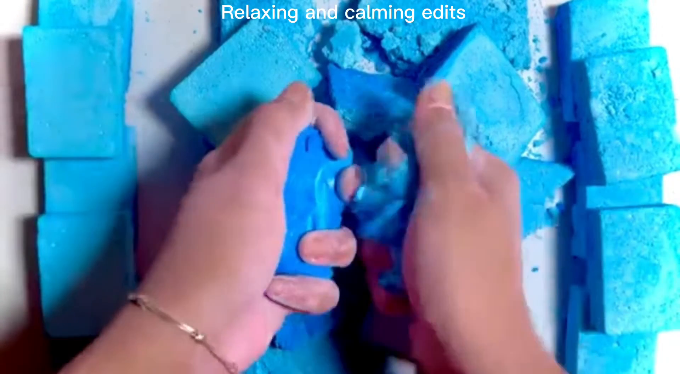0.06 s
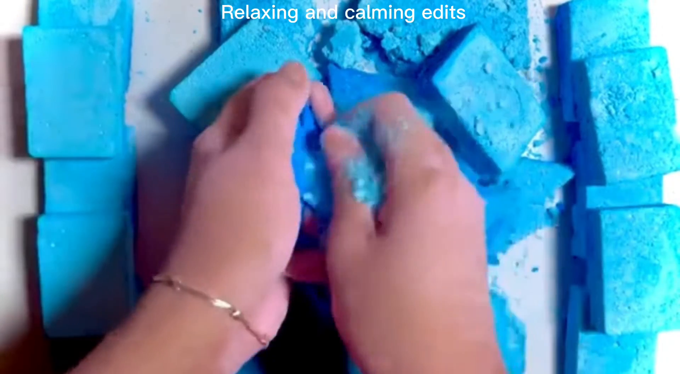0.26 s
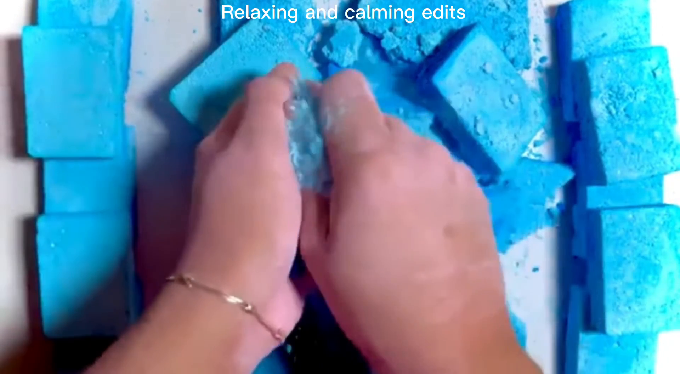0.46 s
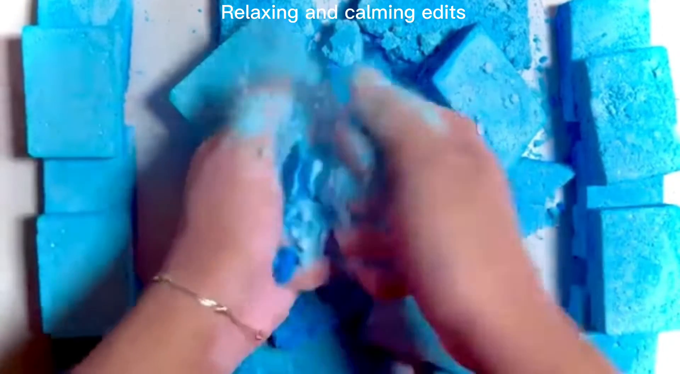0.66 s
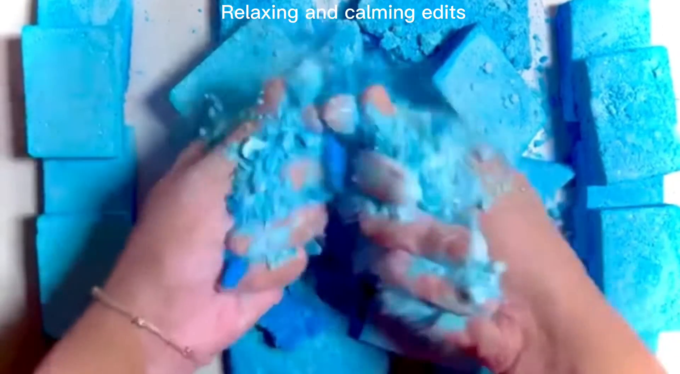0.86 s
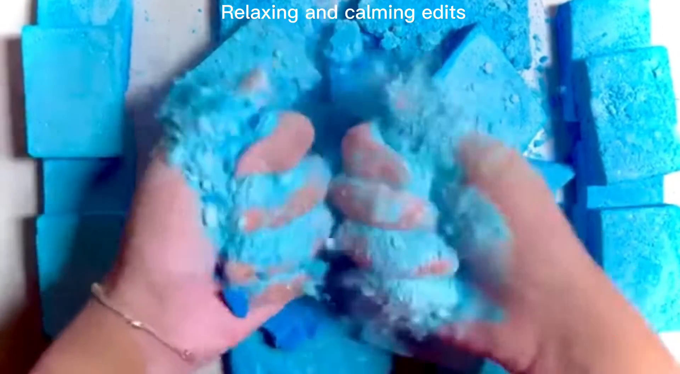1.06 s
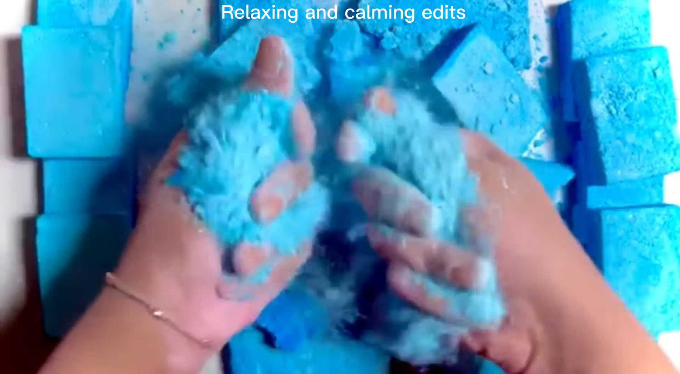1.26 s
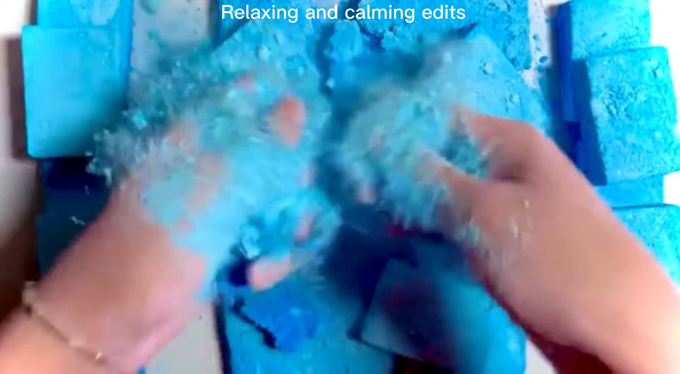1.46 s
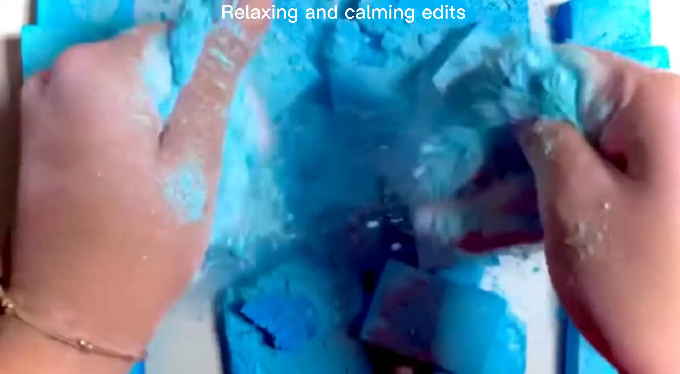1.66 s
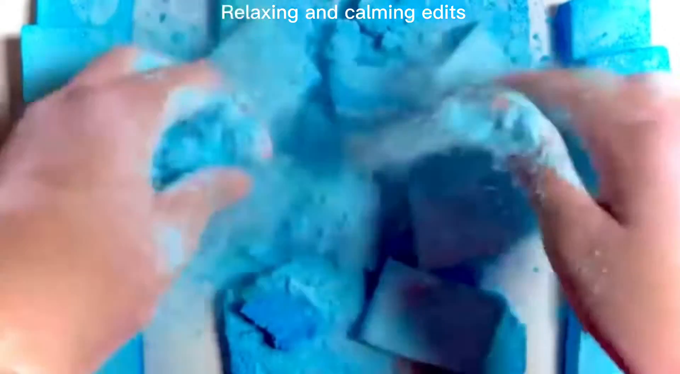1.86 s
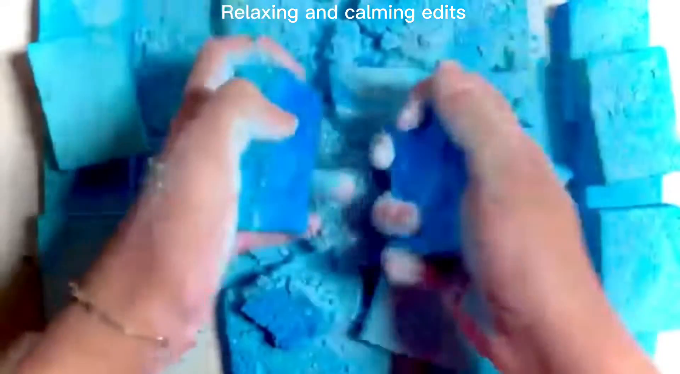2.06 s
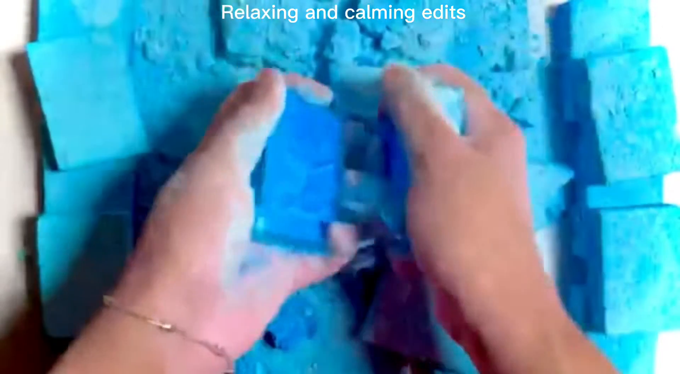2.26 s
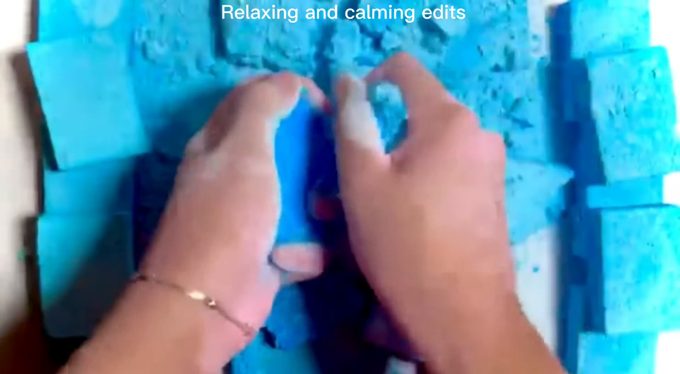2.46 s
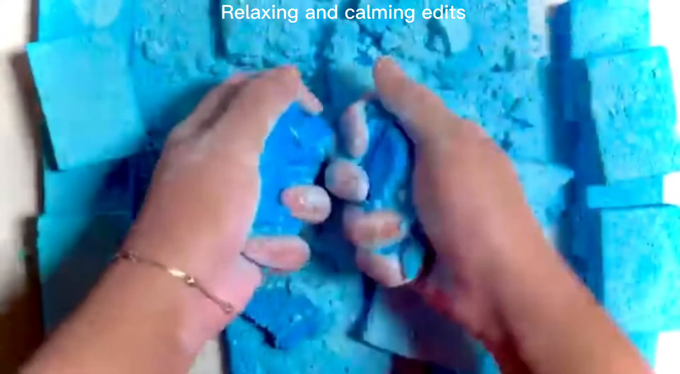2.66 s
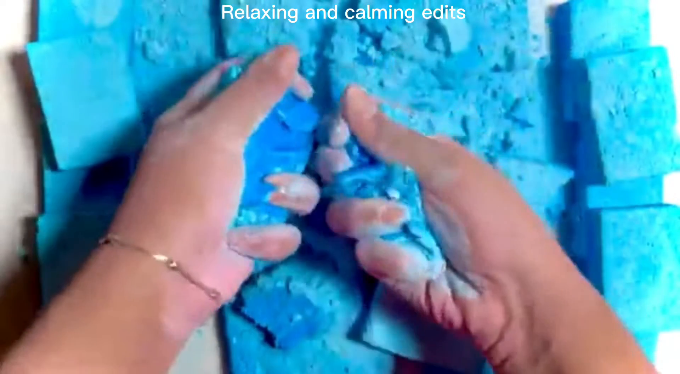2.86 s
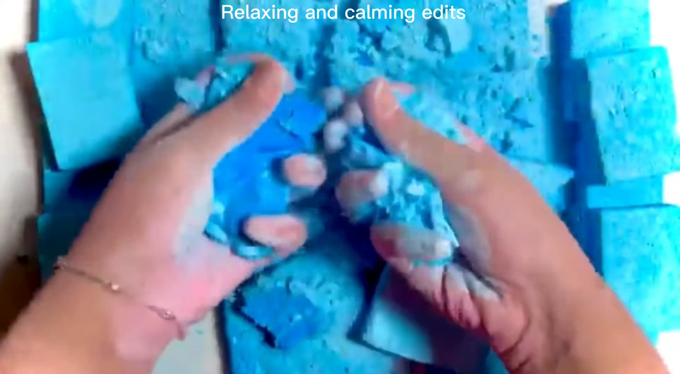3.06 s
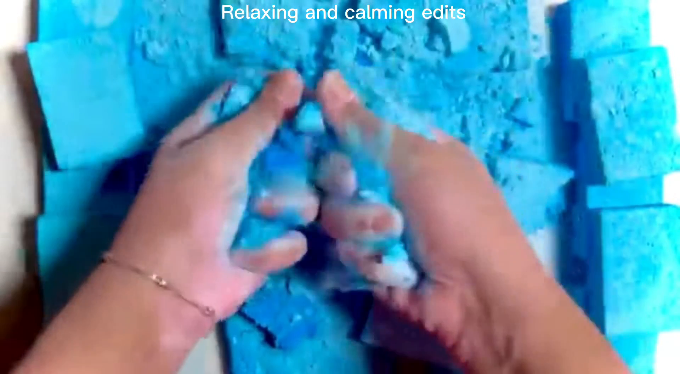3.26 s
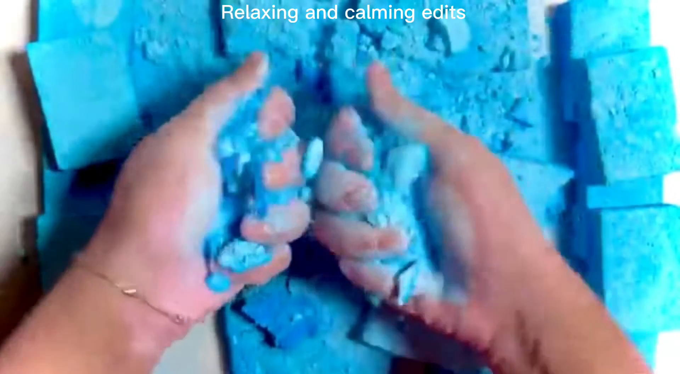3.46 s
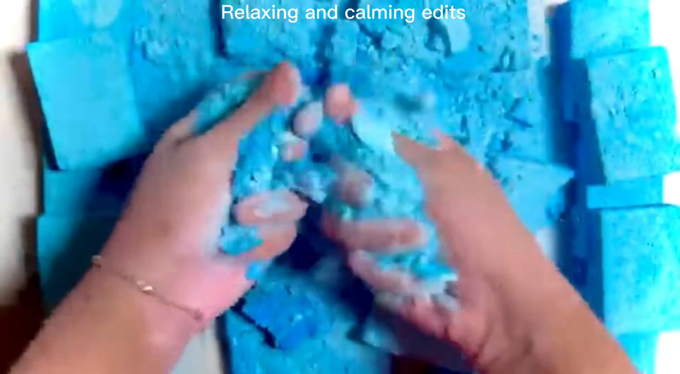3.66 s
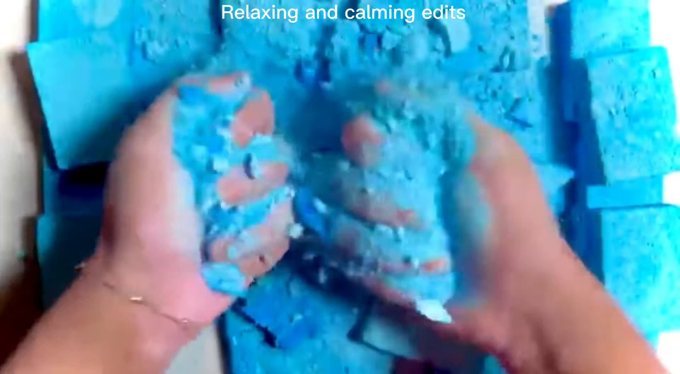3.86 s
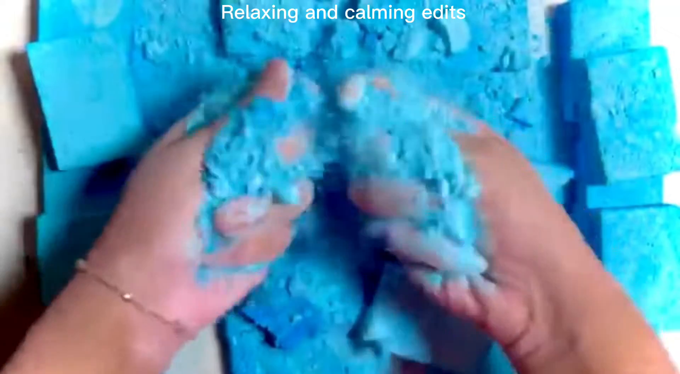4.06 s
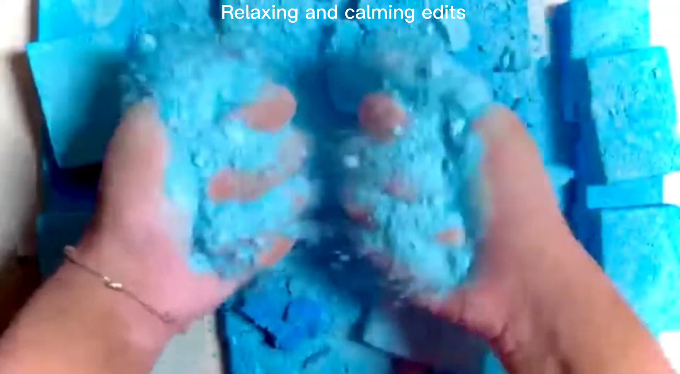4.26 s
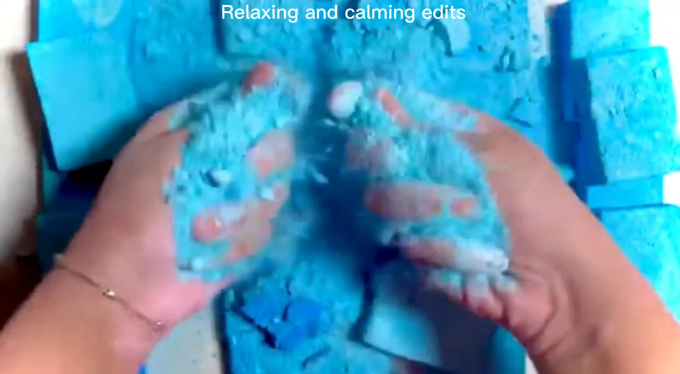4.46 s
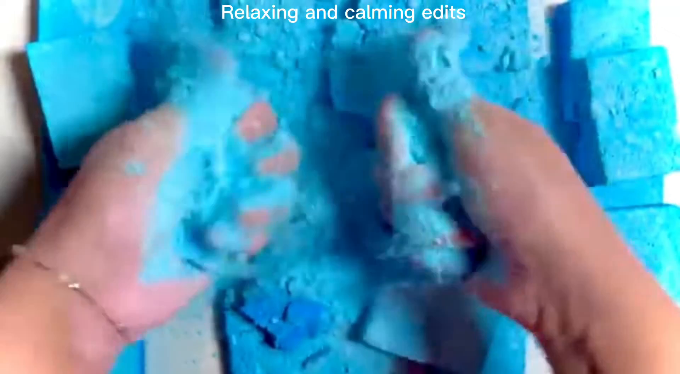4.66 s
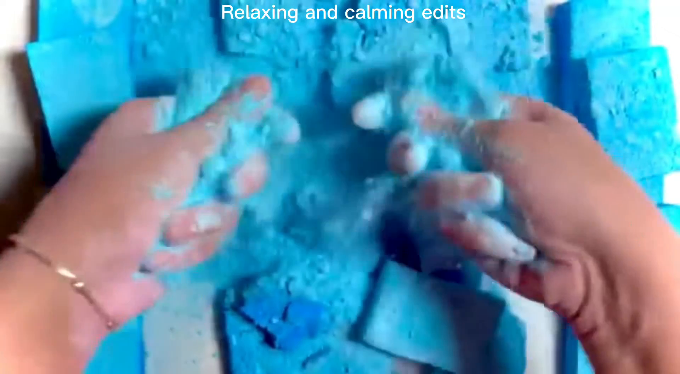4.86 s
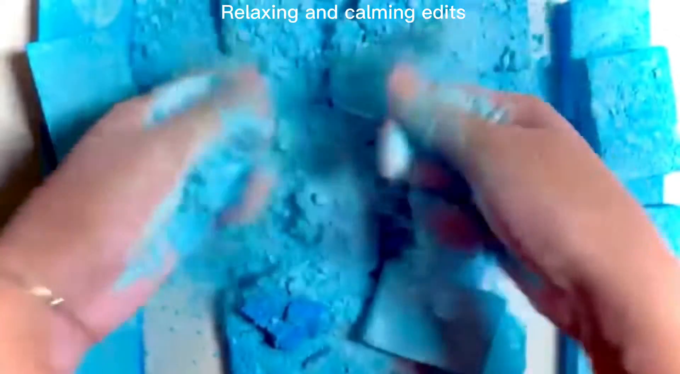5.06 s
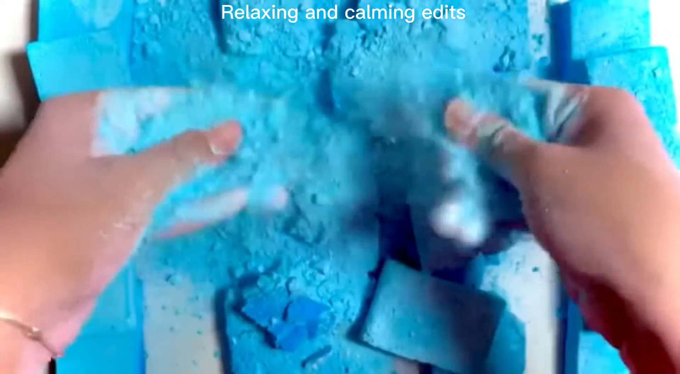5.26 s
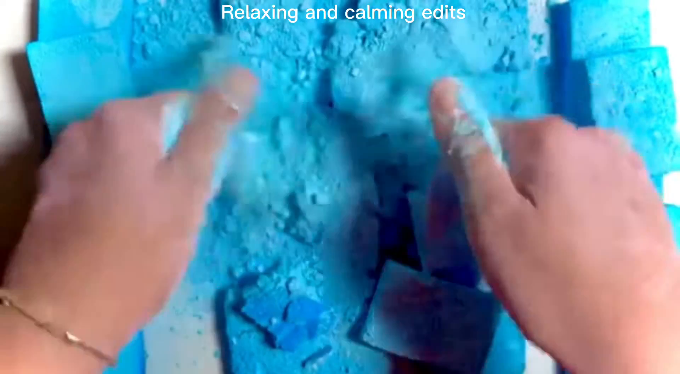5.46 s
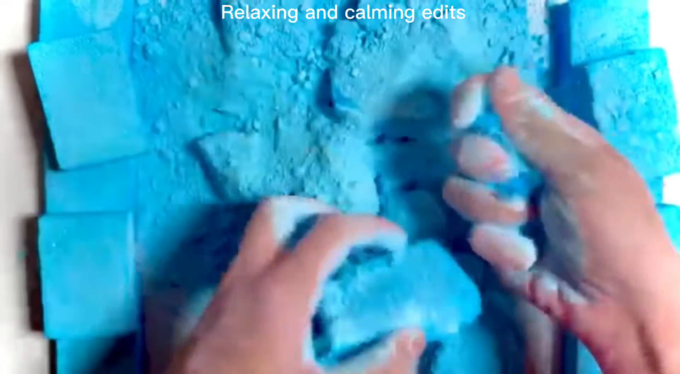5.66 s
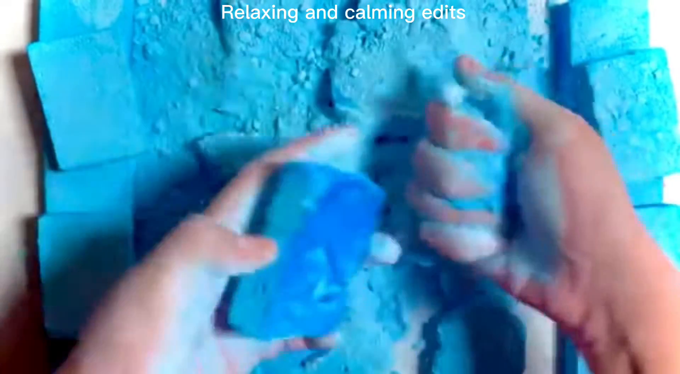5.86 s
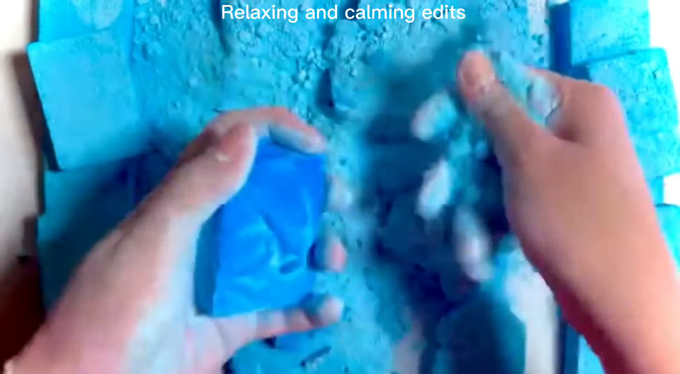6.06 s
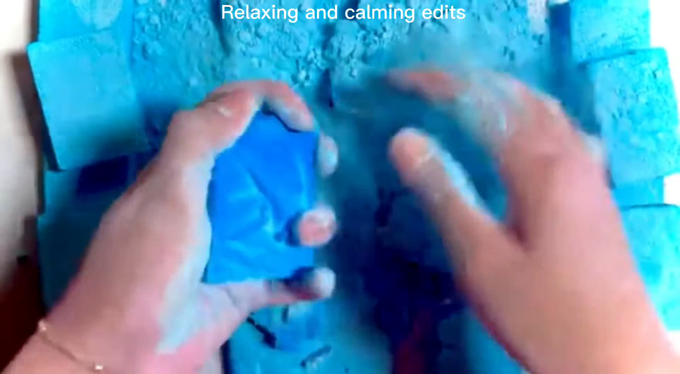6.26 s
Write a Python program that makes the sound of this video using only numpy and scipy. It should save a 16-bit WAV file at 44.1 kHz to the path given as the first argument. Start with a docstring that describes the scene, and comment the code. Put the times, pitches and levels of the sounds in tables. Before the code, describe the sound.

Two hands crush blocks of dry chalk close to a stereo microphone in a quiet room. Two sharp, gritty snaps come first, then the pieces are kneaded with soft crunching and hissing powder. A second cluster of cracks follows, with dull thuds in the palms, and one more break soon after. The rest is gentler, with repeated squeezes of rustling crumbs and spilling dust.

```python
"""Crushing dry chalk by hand

Two hands crush chalk blocks over a table, close to a small stereo microphone in a quiet room.
Blocks snap in short avalanches of fractures that ring the pieces and spray grit. Kneaded crumbs
stick and slip, clods cave in, powder hisses between the fingers and dull thuds sound in the hands."""
import sys
import numpy as np
from scipy import signal
from scipy.fft import rfft, irfft, next_fast_len
from scipy.io import wavfile
from scipy.ndimage import uniform_filter1d

SR = 44100
rng = np.random.default_rng(int(sys.argv[2]) if len(sys.argv) > 2 else 0)


def materialize(psi):
    """Save the field psi as 16-bit PCM at rate SR to the path in sys.argv[1].

    A 1-D psi becomes a single channel; in a 2-D psi each row is a channel.
    """
    bounded = np.clip(np.atleast_2d(psi).T, -1, 1)
    quanta = np.round(bounded * 32767).astype(np.int16)
    wavfile.write(sys.argv[1], SR, quanta)


N = 279153
TIME_S = np.arange(N) / SR
RING_SAMPLES = 4096


def from_db(db):
    return 10 ** (np.asarray(db) / 20)


def unit_rms(x):
    return x / np.sqrt(np.mean(x ** 2) + 1e-20)


def at_hz(table, hz):
    """Table lookup on a log-frequency axis."""
    knots_hz, values = np.transpose(table)
    return np.interp(np.log(np.maximum(hz, 1)), np.log(knots_hz), values)


def impulse(spectrum):
    """Minimum-phase impulse response of a spectrum table."""
    magnitude = from_db(at_hz(spectrum, np.fft.rfftfreq(RING_SAMPLES, 1 / SR)))
    cepstrum = irfft(np.log(magnitude))
    cepstrum[1:RING_SAMPLES // 2] *= 2
    cepstrum[RING_SAMPLES // 2 + 1:] = 0
    return irfft(np.exp(rfft(cepstrum)))


def through(x, response):
    return signal.fftconvolve(x, response)[:len(x)]


def resonance(x, hz, width_hz):
    radius = np.exp(-np.pi * width_hz / SR)
    feedforward = np.array([1, 0, -1]) * (1 - radius ** 2) / 2
    feedback = [1, -2 * radius * np.cos(2 * np.pi * hz / SR), radius ** 2]
    return signal.lfilter(feedforward, feedback, x + 1e-18)


def gliding_resonance(x, hz, width_hz):
    carrier = np.exp(2j * np.pi * np.cumsum(hz) / SR)
    radius = np.exp(-np.pi * width_hz / SR)
    return np.real(carrier * signal.lfilter([1], [1, -radius], x / carrier + 1e-18))


def drift(rate_hz):
    """Smooth random curve, unit RMS."""
    knots = rng.standard_normal(4096)
    return unit_rms(np.interp(TIME_S * rate_hz, np.arange(len(knots)), knots))


def steady(x, window_samples=3000):
    """Levels slow swings to unit RMS; fine grain stays."""
    power = uniform_filter1d(uniform_filter1d(x ** 2, window_samples), window_samples)
    return x / np.sqrt(np.abs(power) + 1e-12)


def add(track, time_s, sound, level_db):
    """Mixes in a sound with the energy of 10 ms at level_db."""
    start = max(round(time_s * SR), 0)
    sound = sound * from_db(level_db) * np.sqrt(0.01 * SR / (np.sum(sound ** 2) + 1e-20))
    track[start:start + len(sound)] += sound[:N - start]


def swell(peak_s, rise_s, fall_s, peak_db):
    """Near-bell-shaped power envelope of one gesture."""
    distance = np.abs((TIME_S - peak_s) / np.where(TIME_S < peak_s, rise_s, fall_s))
    return (from_db(peak_db) * np.exp(-np.minimum(distance ** 1.8, 20))) ** 2


def grains(per_s, spread_db, clump_db, clump_hz):
    """Tiny fractures, many weak and few strong, bunched by stick-slip."""
    sizes = from_db(spread_db * np.minimum(rng.exponential(1, N), 4))
    signs = rng.choice([-1, 1], N)
    hits = rng.random(N) < per_s / SR
    return hits * sizes * signs * from_db(clump_db * drift(clump_hz))


def avalanche(length_s, per_s, first_gain):
    """One break sets off a quick, dying run of others."""
    age = TIME_S[:RING_SAMPLES] / max(length_s, 0.0005)
    sizes = rng.standard_normal(RING_SAMPLES)
    hits = rng.random(RING_SAMPLES) < per_s / SR
    run = sizes * hits * np.exp(-age ** 2 / 2)
    run /= np.sqrt(np.sum(run ** 2)) + 1e-9
    run[0] += first_gain
    return run


# room background (frequency [Hz], gain [dB])
HUSH_SPECTRUM = [(15, -15), (30, -7), (70, -4.5), (130, 6), (260, -2.5), (600, -35), (16000, -46)]

def hush():
    """Low, steady noise of the quiet room."""
    return from_db(-52.5) * unit_rms(through(rng.standard_normal(N), impulse(HUSH_SPECTRUM)))


# rub through the palms (frequency [Hz], gain [dB])
RUB_SPECTRUM = [(40, -39), (80, -20), (130, -4), (200, -4.5), (310, -1), (450, -1.5), (620, -7.5),
                (1200, -42)]
# hollow between palm and fingers (time [s], resonance [Hz])
HOLLOW_GLIDE = [(0, 355), (1.35, 335), (1.8, 186), (3.0, 194), (3.85, 284), (4.08, 133), (4.6, 326),
                (5.1, 327), (5.5, 163)]

def palms():
    """Slipping crumbs, dull through the palms, ring the hollow as it changes size."""
    slips = grains(per_s=700, spread_db=1.5, clump_db=3.0, clump_hz=52)
    hollow_hz = np.interp(TIME_S, *np.transpose(HOLLOW_GLIDE))
    hollow = steady(gliding_resonance(slips, hollow_hz, width_hz=156))
    rub = steady(through(slips, impulse(RUB_SPECTRUM)))
    return steady(rub + from_db(-9) * hollow)


# crumb rustle (frequency [Hz], gain [dB])
CRUMB_SPECTRUM = [(300, -18), (620, -10.5), (780, 1), (1000, -3.5), (1400, -2), (1900, -2.5), (2700, -2.5),
                  (4500, -4), (9000, -35)]

def crumbs(pitch_count=12):
    """Small crumbs break in a dense rustle, each ringing at one of several pitches."""
    breaks = grains(per_s=10000, spread_db=3.6, clump_db=2.0, clump_hz=130)
    pitch_index = rng.integers(0, pitch_count, N)
    rings = sum(resonance(breaks * (pitch_index == k), hz, width_hz=0.48 * hz) / np.sqrt(hz)
                for k, hz in enumerate(np.geomspace(600, 3200, pitch_count)))
    return steady(through(rings, impulse(CRUMB_SPECTRUM)))


# powder hiss (frequency [Hz], gain [dB])
POWDER_SPECTRUM = [(1200, -11.5), (2700, 3), (3800, -2.5), (5100, 2.5), (7000, 1), (10000, -3), (13000, -5),
                   (15500, -23.5)]

def powder():
    """Sliding powder: grains dense enough to hiss."""
    slips = grains(per_s=22000, spread_db=2.5, clump_db=1.7, clump_hz=120)
    return steady(through(slips, impulse(POWDER_SPECTRUM)))


# loose chalk shifting in the hands (time [s], crunch [dB], hiss [dB])
LOOSE_CHALK = [(0, -47.5, -44.5), (.25, -49.5, -46.5), (.65, -46, -42.5), (1.25, -43.5, -41.5),
               (1.9, -47, -44.5), (2.32, -53, -44), (2.65, -47, -49.5), (3.0, -43, -39.5), (3.55, -57, -45),
               (4.0, -43, -43.5), (4.42, -41.5, -46), (4.75, -51.5, -45.5), (5.13, -49.5, -49),
               (5.5, -49, -45.5), (5.88, -52.5, -43), (6.33, -52, -50.5)]
# fist squeezes (peak time [s], rise [s], fall [s], crunch [dB], rub [dB])
FIST_SQUEEZES = [(0.01, 0.037, 0.17, -53, -42.5), (0.18, 0.064, 0.053, -41, -47),
                 (0.29, 0.034, 0.78, -43, -43), (0.57, 0.019, 0.012, -32, -43),
                 (0.89, 0.082, 0.1, -36, -36.5), (1.11, 0.062, .11, -38, -39.5),
                 (1.335, 0.05, 0.032, -35.5, -40), (1.47, 0.086, 0.18, -37.5, -41),
                 (1.67, 0.044, 0.13, -39.5, -42.5), (1.99, 0.099, 0.091, -39.5, -48.5),
                 (2.13, 0.053, 0.064, -41.5, -45), (2.39, 0.027, 0.05, -30.5, -45),
                 (2.535, 0.063, 0.032, -34.5, -35), (2.78, 0.099, 0.11, -39.5, -42),
                 (3.185, 0.045, 0.053, -31, -40), (3.41, 0.29, 0.17, -35.5, -40),
                 (3.65, 0.078, 0.14, -34.5, -33.5), (3.84, 0.075, 0.11, -35, -38.5),
                 (4.07, 0.079, 0.1, -36, -35), (4.18, 0.072, 0.068, -35, -38),
                 (4.47, 0.046, 0.29, -39.5, -40), (4.85, 0.079, 0.11, -36.5, -38.5),
                 (5.209, 0.035, 0.023, -33, -43.5), (5.279, 0.06, 0.082, -34.5, -42),
                 (5.635, 0.034, 0.033, -40, -36), (5.70, 0.071, 0.096, -36.5, -40)]
# powder spilling between the fingers (peak time [s], fall [s], hiss [dB])
POWDER_SPILLS = [(0.279, 0.0095, -36), (0.973, 0.075, -40.5), (1.096, 0.038, -37), (1.344, 0.025, -35),
                 (1.516, 0.34, -40), (2.247, 0.022, -35.5), (2.401, 0.038, -24.5), (2.934, 0.031, -35),
                 (3.158, 0.025, -29), (3.343, 0.11, -39.5), (4.24, 0.049, -41.5), (4.325, 0.049, -41),
                 (4.976, 0.091, -40), (5.085, 0.027, -37), (5.225, 0.08, -44), (5.64, 0.028, -32),
                 (5.724, 0.1, -41), (5.983, 0.032, -38.5), (6.095, 0.02, -35), (6.193, 0.024, -40),
                 (6.32, 0.01, -38)]

def kneading():
    """Loose chalk, squeezes and fracture debris drive rub, crunch and hiss; spills only hiss."""
    knots_s, crunch_db, hiss_db = np.transpose(LOOSE_CHALK)
    # power envelopes
    loose = from_db(np.interp(TIME_S, knots_s, crunch_db)) ** 2
    dust = from_db(np.interp(TIME_S, knots_s, hiss_db)) ** 2
    pressed = sum(swell(peak_s, rise_s, fall_s, db) for peak_s, rise_s, fall_s, _, db in FIST_SQUEEZES)
    crushed = sum(swell(peak_s, rise_s, fall_s, db) for peak_s, rise_s, fall_s, db, _ in FIST_SQUEEZES)
    spilled = sum(swell(peak_s, 0.63 * fall_s, fall_s, db) for peak_s, fall_s, db in POWDER_SPILLS)
    debris = sum(swell(time_s, rise_s=length_s, fall_s=0.055, peak_db=snap_db - 20)
                 for time_s, length_s, _, snap_db, _ in FRACTURES)

    rub_gain = np.sqrt(from_db(-2.5) ** 2 * loose + pressed + from_db(-3.5) ** 2 * debris)
    crunch_gain = np.sqrt(loose + crushed + debris)
    hiss_gain = np.sqrt(dust + from_db(-8) ** 2 * crushed + from_db(-6) ** 2 * debris + spilled)
    hiss = hiss_gain * powder()
    stick_slip = from_db(1.25 * drift(rate_hz=45))  # the whole handful moves together
    return stick_slip * (rub_gain * palms() + crunch_gain * crumbs() + hiss)


# snapping chalk (frequency [Hz], gain [dB])
SNAP_SPECTRUM = [(60, -56), (300, -20), (600, -8.5), (790, -1.5), (970, 1), (1300, -3.5), (1830, -3),
                 (2500, -2), (4500, -2), (9000, -33)]
# collapsing clods (time [s], pitch [Hz], level [dB])
CLOD_COLLAPSES = [(0.076, 1270, -36.5), (0.332, 1310, -32), (0.531, 970, -27), (0.574, 1320, -29),
                  (0.692, 1620, -36.5), (1.2972, 1420, -32.5), (1.402, 1790, -24), (1.4605, 1800, -30.5),
                  (1.674, 1400, -34.5), (1.759, 1370, -37.5), (2.18, 1280, -37.5), (2.829, 1500, -36),
                  (3.2692, 1350, -29.5), (3.322, 2000, -33.5), (3.355, 1800, -33.5), (3.376, 1300, -30),
                  (3.414, 2000, -31), (3.699, 1100, -36), (3.833, 1050, -35), (4.153, 1190, -25.5),
                  (4.175, 1370, -33), (4.479, 900, -32)]

def clods():
    """A clod caves in inside the fist: a short, muffled crunch without grit."""
    track, snap_ring = np.zeros(N), impulse(SNAP_SPECTRUM)
    for time_s, hz, level_db in CLOD_COLLAPSES:
        breaks = avalanche(length_s=0.0029, per_s=3600, first_gain=0.75)
        clod = resonance(breaks, hz, width_hz=0.45 * hz) + 0.082 * breaks
        add(track, time_s, through(clod, snap_ring), level_db)
    return track


def off_table(sound, mean_lag_s, echo_gain):
    """Adds one table-top echo; its lag varies at random with hand position."""
    lag_samples = round(mean_lag_s * (0.5 + rng.random()) * SR)
    return sound + echo_gain * np.pad(sound, (lag_samples, 0))[:len(sound)]


# grit spray (frequency [Hz], gain [dB])
GRIT_SPECTRUM = [(100, -15), (1000, -16), (2600, -1.5), (4900, 5.5), (6300, -0.5), (9000, 0), (13000, -8.5),
                 (16000, -15)]
# dull knock (frequency [Hz], gain [dB])
KNOCK_SPECTRUM = [(30, -54), (80, -10.5), (140, -3.5), (270, -1.5), (450, -0.5), (800, -15.5), (2500, -58)]
# breaking pieces (time [s], knock length [s], pitch [Hz], snap [dB], grit [dB])
FRACTURES = [(0.3519, 0.0068, 2040, -11.5, -26), (0.3536, 0.0076, 780, -14.5, -12),
             (0.52, 0.0094, 1270, -13.5, -41), (0.5218, 0.0045, 940, -24, -23),
             (0.586, 0.0026, 1750, -28.5, -42), (1.438, 0.011, 1970, -28.5, -33.5),
             (1.598, 0.0031, 1880, -33.5, -36), (2.136, 0.0035, 1000, -27, -34.5),
             (2.228, 0.0043, 1740, -22, -25), (2.356, 0.008, 1700, -26, -21),
             (2.3607, 0.0082, 1400, -17, -15.5), (2.375, 0.0062, 1570, -26.5, -20),
             (2.39, .001, 1900, -32, -31), (2.398, 0.012, 1900, -32, -23.5),
             (2.5273, 0.0016, 2040, -23.5, -25), (2.555, 0.0095, 1220, -28.5, -29),
             (2.588, 0.0029, 1620, -31.5, -33.5), (2.737, 0.0027, 1000, -29.5, -29),
             (2.7449, 0.0024, 935, -24, -35.5), (2.782, 0.0016, 1260, -30.5, -33.5),
             (2.917, 0.00087, 1640, -34, -32), (3.052, 0.0037, 1490, -35, -31.5),
             (3.1522, 0.0088, 1950, -17.5, -20), (3.2013, 0.0055, 1840, -28.5, -21.5),
             (3.236, 0.0069, 1650, -30, -23), (3.875, 0.0051, 2040, -32.5, -39.5)]

def cracks():
    """Each break rings the piece, sprays grit and knocks the palm, harder for a harder snap."""
    track = np.zeros(N)
    snap_ring, grit_ring, knock_ring = map(impulse, (SNAP_SPECTRUM, GRIT_SPECTRUM, KNOCK_SPECTRUM))
    mean_snap_db = np.mean([snap_db for _, _, _, snap_db, _ in FRACTURES])
    for time_s, length_s, hz, snap_db, grit_db in FRACTURES:
        breaks = avalanche(length_s / 2, per_s=3600, first_gain=1.22)
        piece = resonance(breaks, hz, width_hz=0.57 * hz) + 0.15 * breaks
        add(track, time_s, through(piece, snap_ring), snap_db)
        spray = through(avalanche(length_s / 2, per_s=4500, first_gain=0.45), grit_ring)
        add(track, time_s, off_table(spray, mean_lag_s=0.00098, echo_gain=0.52), grit_db)
        knock = through(avalanche(length_s, per_s=1200, first_gain=2.2), knock_ring)
        add(track, time_s, knock, level_db=-42 + 0.7 * (snap_db - mean_snap_db))
    return track


# whole blocks breaking (time [s], [(mode [Hz], level [dB]), ...])
BLOCK_MODES = [(0.353, [(190, -28), (280, -22.5), (760, -19.5), (1830, -17), (4750, -26)]),
               (0.5211, [(210, -29), (970, -17), (4710, -19)]), (2.741, [(420, -30.5), (830, -29.5)])]

def blocks():
    """A breaking block rings briefly, hollow between the cupped hands."""
    track, click = np.zeros(N), signal.unit_impulse(RING_SAMPLES)
    for time_s, modes in BLOCK_MODES:
        for hz, level_db in modes:
            add(track, time_s, resonance(click, hz, width_hz=75 + 0.03 * hz), level_db)
    return track


# low thuds in the hands (time [s], relative level [dB], pitch [Hz])
HAND_THUDS = [(0.583, -28, 205), (0.965, -20, 310), (1.335, -28, 330), (2.133, -24, 247),
              (2.227, -22.5, 220), (2.421, -23, 165), (2.524, -22, 224), (2.738, -20, 260),
              (2.971, -17.5, 198), (3.151, -16.5, 230), (3.853, -20.5, 390), (4.629, -26, 432),
              (5.078, -24, 320), (5.384, -32, 308), (5.693, -32, 440)]

def thuds():
    """Dull, low thuds in the hands, many under the heavier cracks."""
    track, knock_ring = np.zeros(N), impulse(KNOCK_SPECTRUM)
    for time_s, relative_db, hz in HAND_THUDS:
        knock = through(avalanche(length_s=0.01, per_s=840, first_gain=1.76), knock_ring)
        thud = resonance(knock, hz, width_hz=108) + 0.16 * knock
        add(track, time_s, thud, relative_db - 6.5)
    return track


# splinters flying off (time [s], level [dB])
SPLINTER_TICKS = [(0.97, -34.5), (2.009, -35.5), (2.2395, -24.5), (2.809, -36.5), (3.108, -35),
                  (4.024, -33.5), (4.239, -35), (4.704, -36.5), (5.511, -38), (5.591, -33)]

def splinters():
    """A thin flake breaks off with a short, bright tick."""
    track = np.zeros(N)
    highpass = signal.butter(1, 4600, "high", fs=SR, output="sos")
    tick = signal.sosfilt(highpass, impulse(GRIT_SPECTRUM))
    for time_s, level_db in SPLINTER_TICKS:
        breaks = avalanche(length_s=0.0038, per_s=17000, first_gain=1.0)
        add(track, time_s, through(breaks, tick), level_db)
    return track


def room(fft_size, t60_s=0.22):
    """Frequency response of a short, dense echo tail of unit energy."""
    tail = rng.standard_normal(N) * from_db(-60 * np.minimum(TIME_S / t60_s, 2))
    return rfft(tail / np.sqrt(np.sum(tail ** 2)), fft_size)


# phase between microphone ports (frequency [Hz], left lead [rad])
PORT_LEAD = [(0, 0), (520, -.7), (780, .2), (1400, -.3), (1850, .1), (2700, 2.6), (3900, 1.5), (5000, 1.2),
             (5900, 3.1), (8000, 6.28), (14000, 15.2), (16000, 16.2)]
# balance between ports (frequency [Hz], left minus right [dB])
PORT_TILT = [(130, -1.5), (290, -3), (640, -4.5), (1410, 0), (3100, -1.5), (6820, 0)]
# phase-drifting copy that widens the sound (frequency [Hz], level re direct [dB])
STEREO_WIDTH = [(60, -34), (300, -13), (600, -8), (1700, -12), (2700, -5), (4500, -4), (7000, -7.5)]

def stereo_microphone(x, bass_lag_s=0.0063, bass_corner_hz=452, copy_lag_s=0.0006925, room_db=-21):
    """Direct sound, a widening copy and the room in each channel; the lows arrive slightly late."""
    fft_size = next_fast_len(N + SR // 2)
    hz = np.fft.rfftfreq(fft_size, 1 / SR)
    late_bass = np.exp(-2j * np.pi * bass_lag_s * bass_corner_hz * np.arctan(hz / bass_corner_hz))
    lead_rad = np.interp(hz, *np.transpose(PORT_LEAD))
    width = from_db(at_hz(STEREO_WIDTH, hz))
    direct = rfft(x, fft_size)
    analytic = signal.hilbert(x, fft_size)[:N]
    ports = []
    for side in (1, -1):  # left, right
        # stereo width: a copy with randomly drifting phase in each channel
        copy = np.real(analytic * np.exp(1j * np.pi * drift(rate_hz=90)))
        delayed = rfft(copy, fft_size) * np.exp(-2j * np.pi * hz * copy_lag_s)
        near = (direct * np.exp(0.5j * side * lead_rad) + width * delayed) / np.sqrt(1 + width ** 2)
        reverb = from_db(room_db) * direct * room(fft_size)
        balance = from_db(side * at_hz(PORT_TILT, hz) / 2)
        ports.append(irfft((near + reverb) * late_bass * balance, fft_size)[:N])
    return np.array(ports)


def scene():
    """Chalk over the room's hush, in stereo."""
    return stereo_microphone(hush() + cracks() + blocks() + clods() + splinters() + thuds() + kneading())


# brief dropouts (start [s], end [s])
DROPOUTS = [(2.013, 2.035), (5.561, 5.579)]
DROPOUT_DB, CUTOFF_HZ = -32, 16300

def record(dry):
    """The level dips twice, peaks clip at full scale, the top treble is cut."""
    dropped = sum((TIME_S > start_s) & (TIME_S < end_s) for start_s, end_s in DROPOUTS)
    gain = from_db(DROPOUT_DB * uniform_filter1d(dropped.astype(float), size=128))
    clipped = np.clip(dry * gain, -1, 1)
    lowpass = signal.ellip(10, 0.2, 70, CUTOFF_HZ, fs=SR, output="sos")
    return signal.sosfilt(lowpass, clipped)


dry = scene()
out = record(dry)
materialize(out)
```